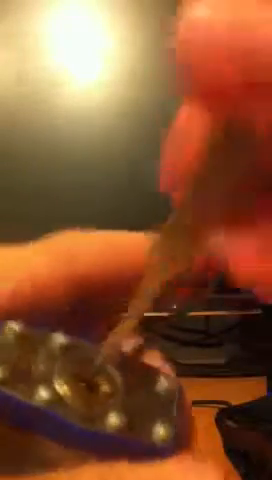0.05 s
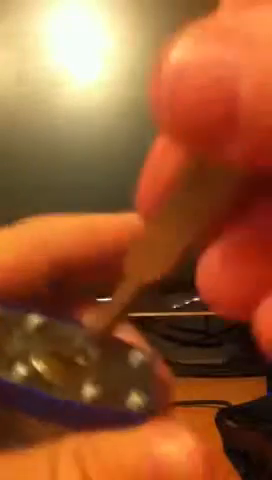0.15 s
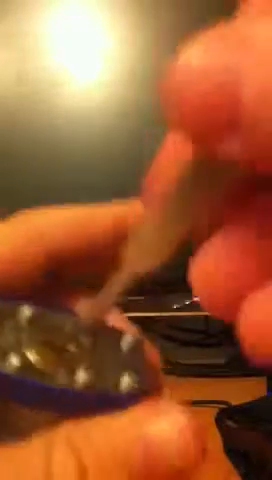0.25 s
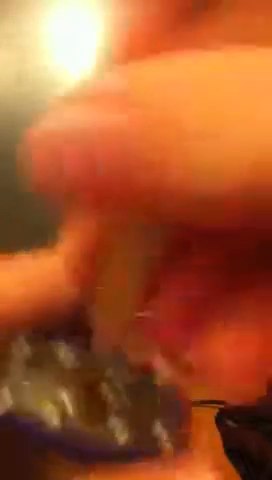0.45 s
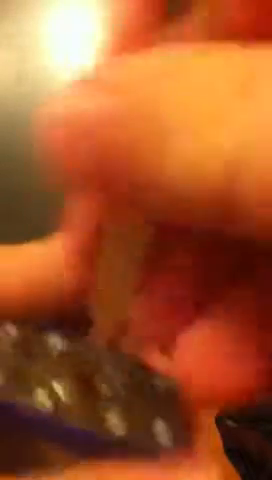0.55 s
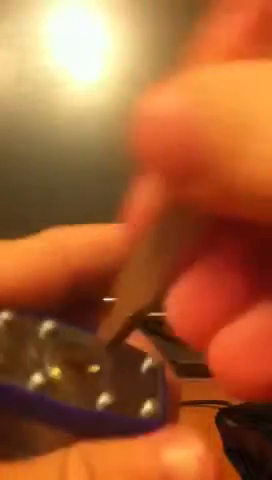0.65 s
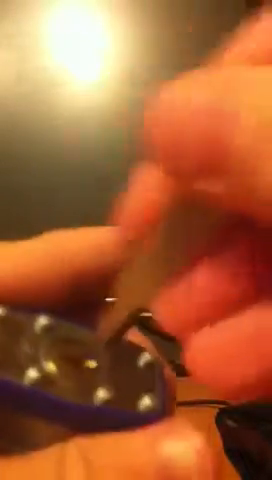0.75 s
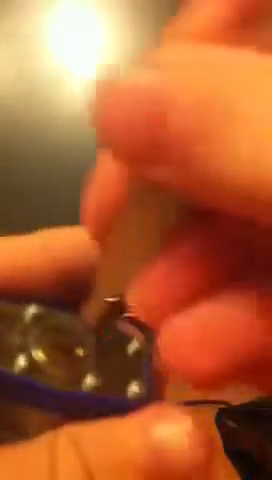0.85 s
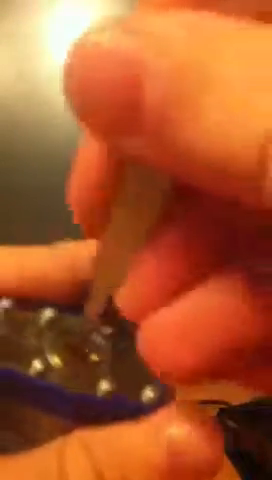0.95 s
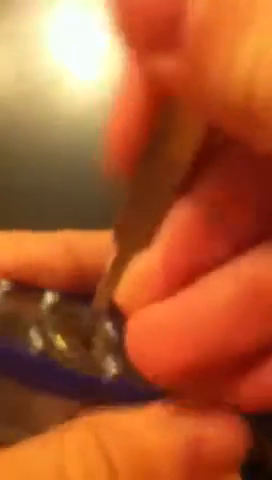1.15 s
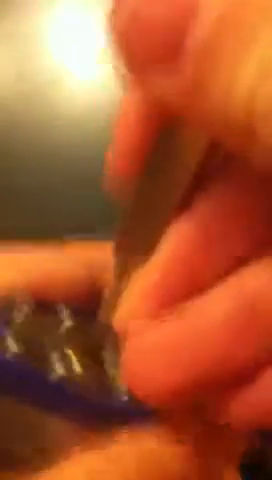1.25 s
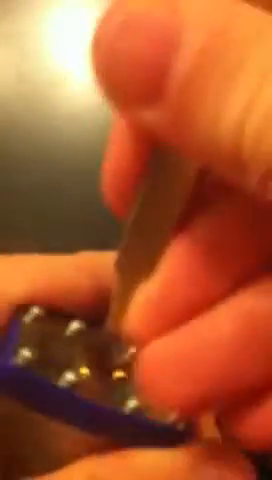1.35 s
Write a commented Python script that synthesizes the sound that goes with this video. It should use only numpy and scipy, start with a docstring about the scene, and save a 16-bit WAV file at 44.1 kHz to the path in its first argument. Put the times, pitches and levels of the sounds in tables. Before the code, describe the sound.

A thin metal pick clicks and scrapes inside a padlock, close by in a quiet room.

```python
"""Clusters of sharp little clicks, short scrapes and soft bumps sound close by in a small quiet room.
They come from a thin steel pick worked inside a hand-held padlock. The pick scrapes over the pins and
clicks as it slips off them; the lock rings very briefly and bumps in the hand. A short room echo
follows each click, over a low drone and faint hiss."""
import sys
import numpy as np
from scipy import signal
from scipy.fft import rfft, irfft
from scipy.io import wavfile

SR = 44100
rng = np.random.default_rng(int(sys.argv[2]) if len(sys.argv) > 2 else 0)


def master(y):
    """Save y as 16-bit WAV."""
    cut = np.clip(np.atleast_2d(y).T, -1, 1)
    pcm = np.round(cut * 32767)  # scale
    wavfile.write(sys.argv[1], SR, pcm.astype(np.int16))


N = 61739


def from_db(db):
    """Turn decibels into a number to multiply a sound by."""
    return 10 ** (np.asarray(db) / 20)


def rms_one(x):
    """Scale a sound so that its average strength (rms) is 1."""
    return x / np.sqrt(np.mean(x ** 2) + 1e-20)


def seconds(length):
    """The time of each sample, in seconds."""
    return np.arange(int(length * SR)) / SR


def fade(t, fade_s):
    """A dying curve. A fade time, here and below, is the time taken to drop by 60 dB."""
    return np.exp(-np.log(1000) * t / fade_s)


def add(out, start_s, x):
    """Mix x into out at the given time."""
    i = int(start_s * SR)
    out[i:i + len(x)] += x[:max(N - i, 0)]


def cut(x, hz, kind, order=2):
    """Keep what lies below hz ("low") or above it ("high")."""
    return signal.sosfilt(signal.butter(order, hz, kind, fs=SR, output="sos"), x)


def bell(x, hz, q, db):
    """Lift or dip the sound around hz; a larger q makes the region narrower."""
    w, a = 2 * np.pi * hz / SR, from_db(db / 2)
    k = np.sin(w) / (2 * q)
    return signal.lfilter([1 + k * a, -2 * np.cos(w), 1 - k * a],
                          [1 + k / a, -2 * np.cos(w), 1 - k / a], x)


def ring(x, hz, fade_s):
    """Each push in x starts a dying tone."""
    r, w = fade(1 / SR, fade_s), 2 * np.pi * hz / SR
    return signal.lfilter([.5, 0, -.5], [1, -2 * r * np.cos(w), r * r], x + 1e-18)


def coloured_noise(spectrum):
    """Steady noise whose tone follows a list of (frequency [Hz], level [dB]) points."""
    hz, db = np.transpose(spectrum)
    freqs = np.maximum(np.fft.rfftfreq(N, 1 / SR), 1)
    shape = from_db(np.interp(np.log(freqs), np.log(hz), db))
    return irfft(rfft(rng.standard_normal(N)) * shape, N)


def background():
    """A low room drone, an even hiss and a few wavering hums made of narrow bands of noise."""
    # tone of the drone: (frequency [Hz], relative level [dB])
    drone_shape = [(15, -64), (25, -25), (48, -24), (86, -18.5), (107, -8.5), (156, -2.5), (177, -10.5),
                   (223, 2.5), (249, -6), (266, -13), (308, -10), (374, -15.5), (412, -9.5), (659, -20),
                   (854, -14), (926, -23), (1200, -27), (1560, -37), (2640, -120)]
    # tone of the hiss: (frequency [Hz], relative level [dB])
    hiss_shape = [(590, -28), (1000, 4), (1820, -3.5), (2490, -8), (2890, -6.5), (5400, -7.5),
                  (8870, -10.5), (15100, -14), (15800, -5.5)]
    # hums in the room: (pitch [Hz], width [Hz], level [dB])
    hums = [(118.3, 8.8, -73), (158, 9.9, -73.5), (228, 23, -66.5), (242, 30, -74.5)]
    split_hz = 1320
    drone = rms_one(cut(coloured_noise(drone_shape), split_hz, "low", order=4))
    hiss = rms_one(cut(coloured_noise(hiss_shape), split_hz, "high", order=4))
    out = from_db(-60.5) * drone + from_db(-65.5) * hiss
    freqs = np.fft.rfftfreq(N, 1 / SR)
    for hz, width, db in hums:
        band = rfft(rng.standard_normal(N)) / (1 + ((freqs - hz) / width) ** 2)
        out += from_db(db) * rms_one(irfft(band, N))
    return out


def echoes(delay_s, fade_s):
    """A dense, dying train of echoes with a total energy of 1."""
    t = seconds(0.46)
    tail = rng.standard_normal(len(t)) * fade(t, fade_s) * (t > delay_s)
    return tail / np.sqrt(np.sum(tail ** 2))


def room_echo(x):
    """The room answers with a short wash of echoes whose treble dies first."""
    delay_s, split_hz = 0.0067, 6600
    low_tail = cut(echoes(delay_s, fade_s=0.36), split_hz, "low")
    high_tail = cut(echoes(delay_s, fade_s=0.23), split_hz, "high")
    # the room hears the lock from all sides, so its tones blur into one broad lift
    blurred = bell(x, hz=4180, q=0.17, db=6.5)
    return from_db(-14.5) * signal.fftconvolve(blurred, low_tail + high_tail)[:N]


def near_echo(x):
    """Sound bounces quickly off the hands and desk."""
    return from_db(-16.5) * signal.fftconvolve(x, echoes(delay_s=0.0018, fade_s=0.014))[:N]


def lock_bumps():
    """The lock bumps in the hand: a soft low thud with a short knock of its casing."""
    # bumps: (time [s], level [dB], thud pitch [Hz], knock gain [dB])
    bumps = [(.0560, -36.5, 173, -16.5), (0.2167, -39, 272, -1), (0.3556, -33, 260, -4.5),
             (0.5682, -35.5, 270, -18), (.5780, -32, 187.5, -3.5), (0.7248, -53, 238, 6)]
    # tones of the casing: (pitch [Hz], relative level [dB], fade time [s])
    casing_tones = [(292, -10, 0.05), (636, -2.5, 0.01), (744, -5.5, 0.027)]
    out, t = np.zeros(N), seconds(.1)

    def tone(hz, fade_s):
        return np.sin(2 * np.pi * hz * t) * fade(t, fade_s)

    knock = sum(from_db(db) * tone(hz, fade_s) for hz, db, fade_s in casing_tones)
    soft_start = 1 - np.exp(-t / .002)
    for start_s, db, hz, knock_db in bumps:
        thud = tone(hz, fade_s=.042) * soft_start
        add(out, start_s, from_db(db) * (thud + from_db(knock_db) * knock))
    return cut(out, 127, "high")


def lock_body(force):
    """A push on the metal gives a sharp crack and tones that die almost at once."""
    # tones of the lock and pick: (pitch [Hz], relative level [dB], fade time [s])
    metal_tones = [(1270, -42, 0.0063), (1713, -20, 0.01), (2050, -15.5, 0.0049), (2490, -14.5, 0.0052),
                   (2860, -8, 0.0037), (3667, -5.5, 0.0049), (4200, -11, 0.0031), (5210, -9, 0.0033),
                   (5556, -8, 0.0045), (6150, -11, 0.0068), (6580, -15, 0.0074), (7280, -15.5, 0.0077),
                   (8030, -17.5, 0.015), (8850, -23, 0.026), (12050, -13, 0.0074), (13800, -8.5, 0.0082),
                   (14900, -8.5, 0.0073)]
    ringing = sum(from_db(db - 6) * ring(force, hz, fade_s) for hz, db, fade_s in metal_tones)
    crack = from_db(2.5) * force
    return cut(ringing + crack, 420, "high")


def pick_scrapes():
    """Many tiny slips shake the lock while the pick drags over a pin."""
    # drags of the pick: (time [s], length [s], level [dB])
    drags = [(0.051, 0.025, -53), (0.212, 0.016, -46.5), (0.356, 0.011, -47), (0.5703, 0.018, -37.5),
             (0.756, .012, -58), (1.138, 0.038, -63.5), (1.283, 0.019, -67.5)]
    slips_per_s = 2500
    slips = rng.standard_normal(N) * (rng.random(N) < slips_per_s / SR)
    pressure = np.zeros(N)
    for start_s, length, db in drags:
        swell = np.sqrt(np.sin(np.pi * seconds(length) / length))
        add(pressure, start_s, from_db(db) * swell)
    return pressure * rms_one(cut(lock_body(slips), 680, "high"))


def pick_strikes():
    """Pick hits pin: one sharp push and a gritty trail. Where it lands sets the pitch of its ring."""
    # strikes: (time [s], level [dB], bass cut [Hz], middle lift [dB], pick pitch [Hz],
    # pick ring lift [dB], treble lift [dB], grit against the push [dB], time for grit to fall to 37% [s])
    strikes = [ (.0550, -45, 2000, 4.5, 7260, 20.5, -2, -12, 0.00067),
               (.0627, -44, 890, -28, 7200, -6, 12, -1, 0.0008),
               (0.064, -29.5, 603, -3, 7500, -1, -11, -9.5, 0.00078),
               (0.2152, -35, 1090, 3, 5200, 10.5, -20, -3, 0.00046),
               (.2176, -35, 910, 1, 7700, 12, 19, -11, 0.0003),
               (0.2193, -24, 1010, 1.5, 5740, 8.5, -8.5, -10.5, 0.00078),
               (0.354, -39, 707, -12, 6800, -2, 0, -18, 0.00031),
               (0.3589, -22.5, 795, -16, 6500, -30, -8, -11.5, 0.00056),
               (0.3576, -31, 700, -14, 6330, 14.5, 6, -12.5, 0.0008),
               (0.3602, -24, 450, -15.5, 5560, 11, -5.5, -10.5, 0.0011),
               (0.5689, -38, 890, 5, 7000, -10, 6, -6.5, 0.0019),
               (0.5765, -34.5, 1520, 1.5, 5200, 0, 22, -9.5, 0.00024),
               (0.5792, -13, 1680, 11, 6000, 1.5, -2.5, -17, 0.00092),
               (0.7104, -39.5, 1390, 1, 7400, 7, -11, -18, 0.00033),
               (0.7152, -50.5, 2000, 3, 7950, 15.5, 7, -9, 0.00055),
               (0.7225, -41.5, 1200, -12, 5540, 10, -10, -15, .0004),
               (0.7241, -33.5, 1500, 2.5, 5130, 16, -10, -17, 0.00058),
               (0.7611, -42, 1000, -3.5, 7600, 10.5, -33.5, -3, 0.00094),
               (1.0261, -47.5, 1190, -4.5, 6860, 13.5, -11, -10, 0.00065),
               (1.0345, -49, 1500, 3.5, 7060, 10.5, 1, -10, 0.00091),
               (1.0703, -55.5, 1510, -5, 7000, -6, 6, -8.5, .0005),
               (1.141, -57, 1200, -11, 6000, 1, 5, -7, 0.0011),
               (1.1686, -53.5, 1200, -7, 3800, 6, 2, -7, 0.00076),
               (1.2352, -45.5, 900, -6, 5560, 8, 10.5, -6.5, 0.00051),
               (1.2702, -57.5, 1500, 4, 11000, 13.5, 5, -6.5, 0.00064), ]
    force, t = np.zeros(N), seconds(.01)
    for start_s, db, low_hz, middle_db, pick_hz, pick_db, treble_db, grit_db, grit_s in strikes:
        push = from_db(grit_db) * rng.choice([-1, 1], len(t)) * np.exp(-t / grit_s)
        push[0] = -1  # the sharp push comes first, then the grit
        push = cut(push, low_hz, "high")
        push = bell(push, hz=2700, q=1, db=middle_db)
        push = bell(push, hz=14800, q=0.91, db=treble_db)
        push = bell(push, hz=pick_hz, q=2.43, db=pick_db)
        add(force, start_s, from_db(db) * push)
    return force


def scene():
    """Mix the lock, its echoes and the background into one channel."""
    force, scrape, bump = pick_strikes(), pick_scrapes(), lock_bumps()
    lock = lock_body(force) + scrape + bump
    into_room = force + scrape + from_db(-4) * bump  # the small lock sends little bass into the room
    return (lock + near_echo(lock) + room_echo(into_room) + background())[None]


def record(dry):
    """Cut away the very highest treble steeply."""
    top_cut = signal.firwin(161, cutoff=15900, window=("kaiser", 8), fs=SR)
    return signal.fftconvolve(dry, top_cut[None], "same", axes=1)


dry = scene()
out = record(dry)
master(out)
```